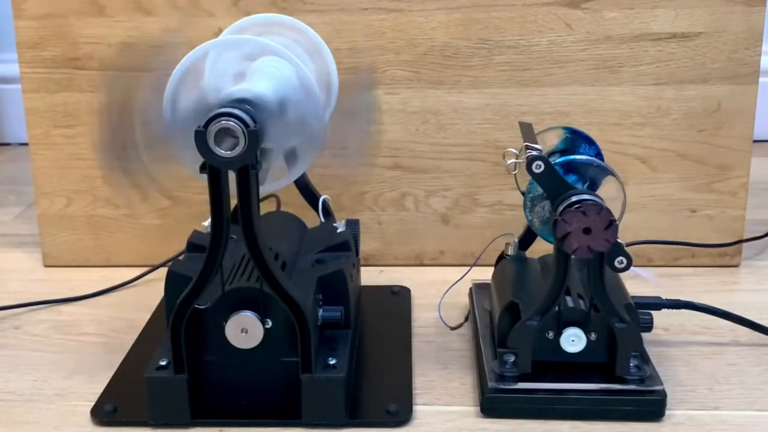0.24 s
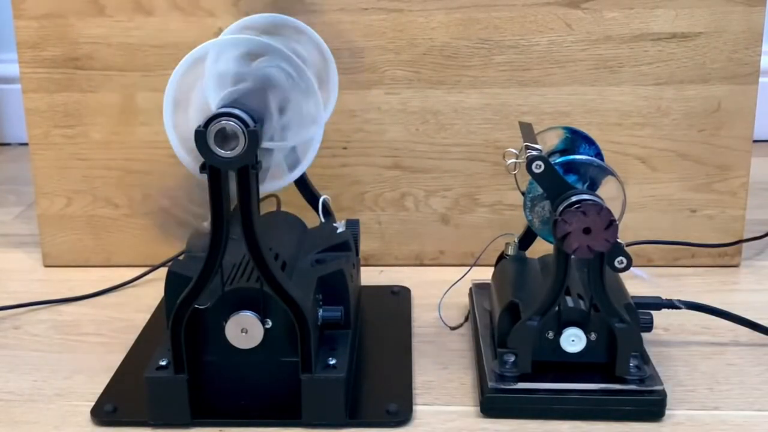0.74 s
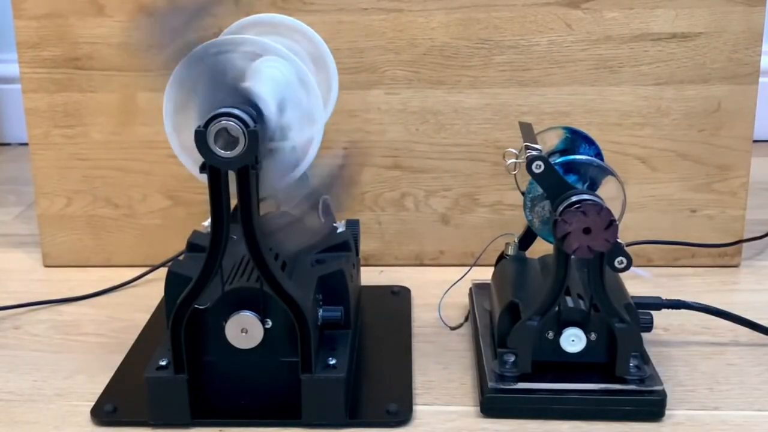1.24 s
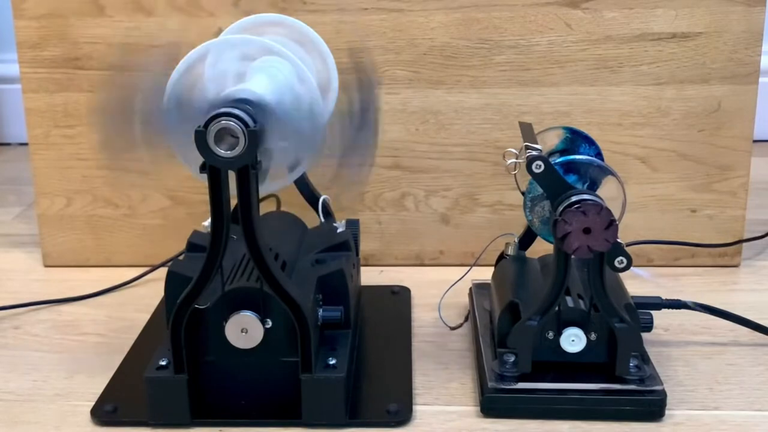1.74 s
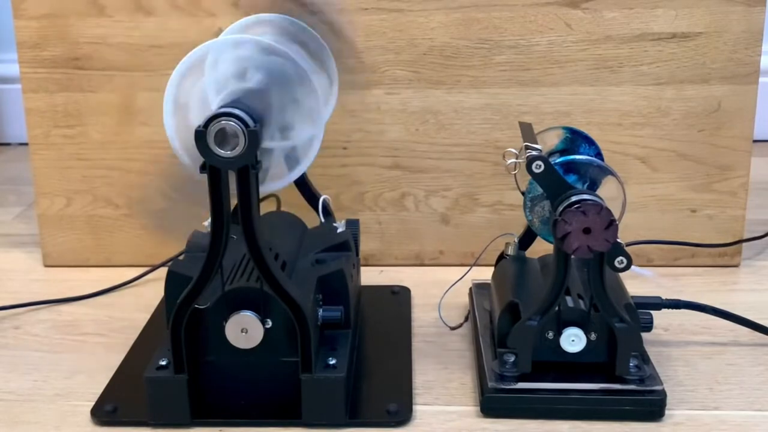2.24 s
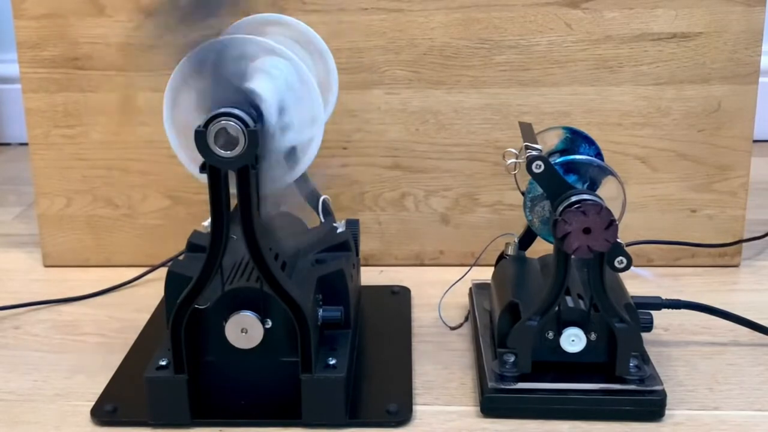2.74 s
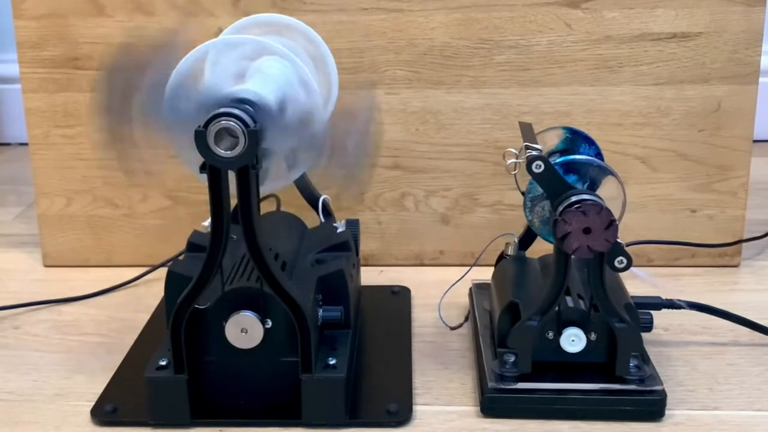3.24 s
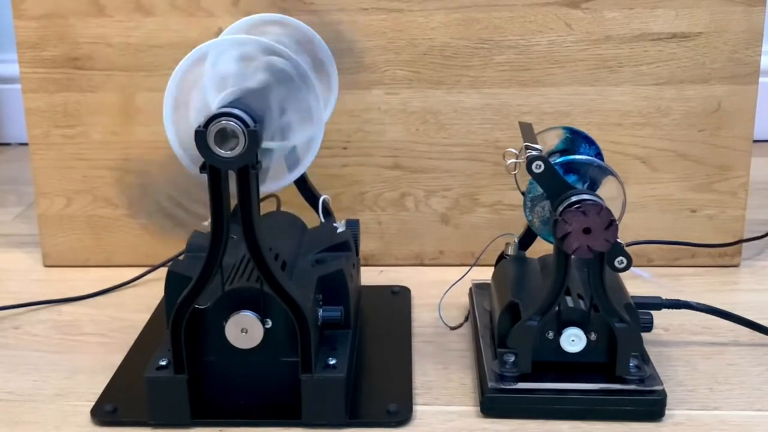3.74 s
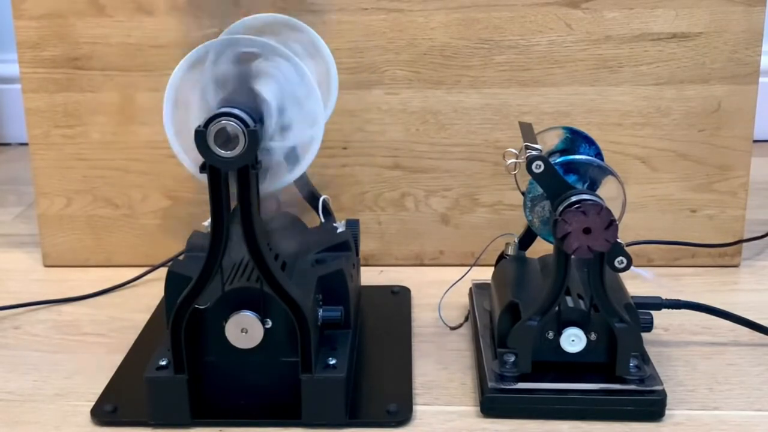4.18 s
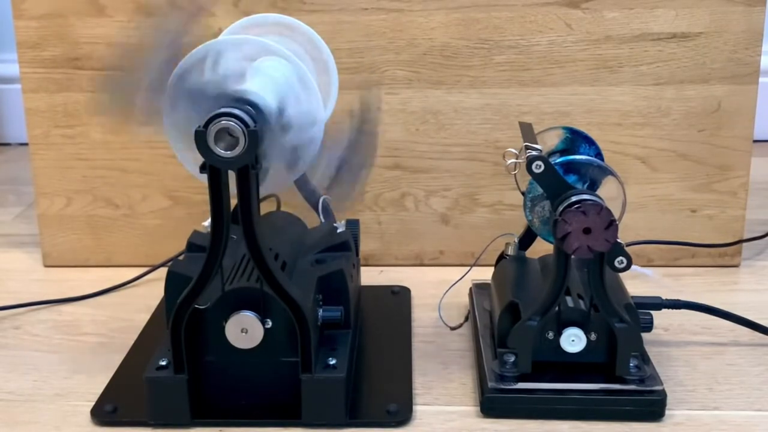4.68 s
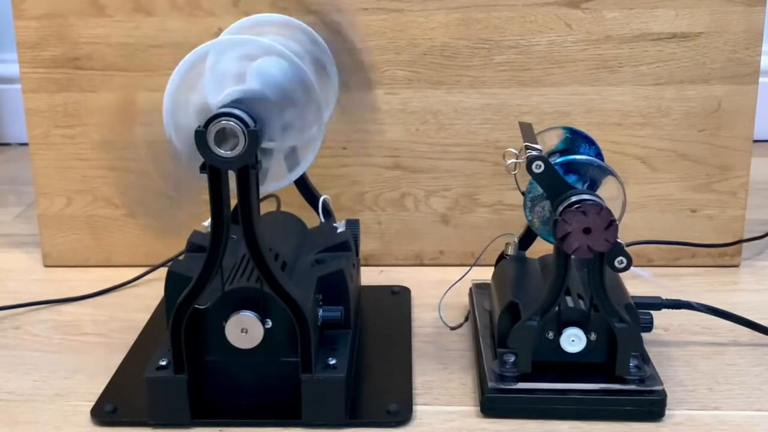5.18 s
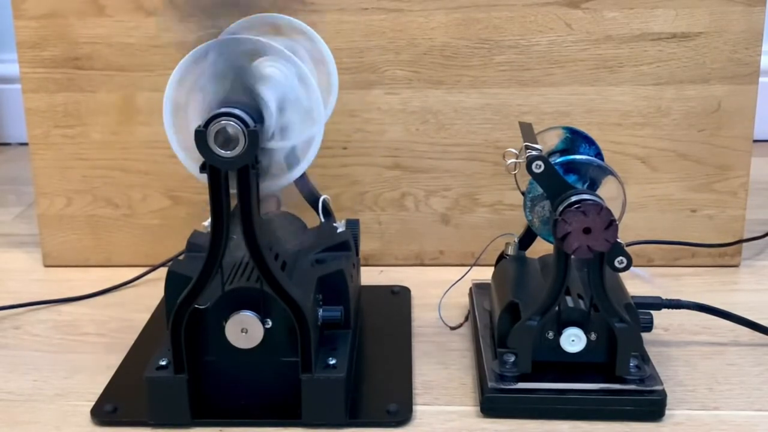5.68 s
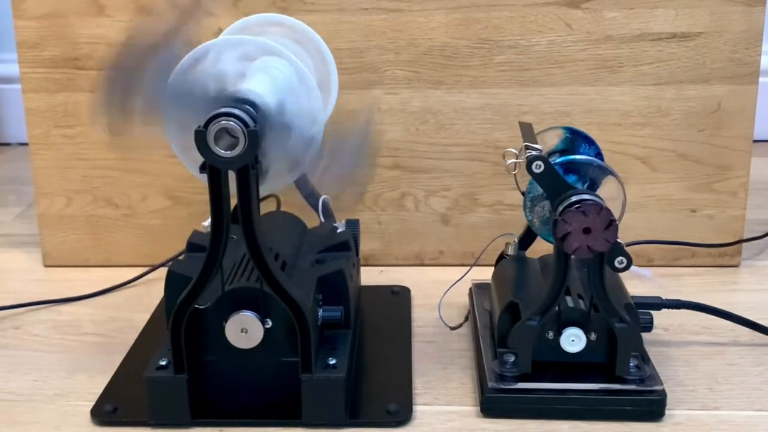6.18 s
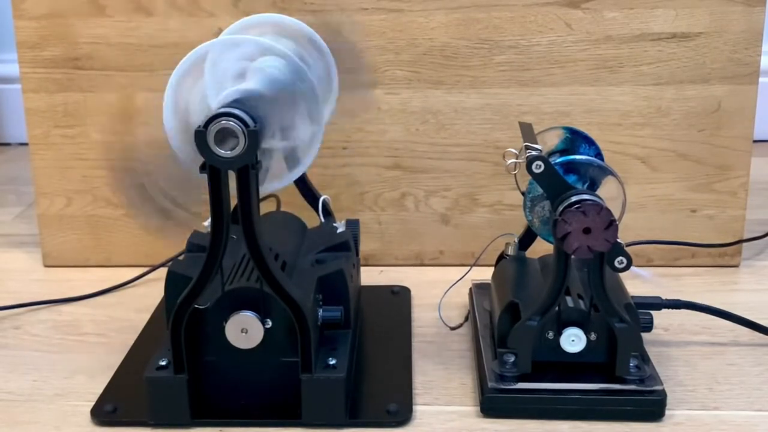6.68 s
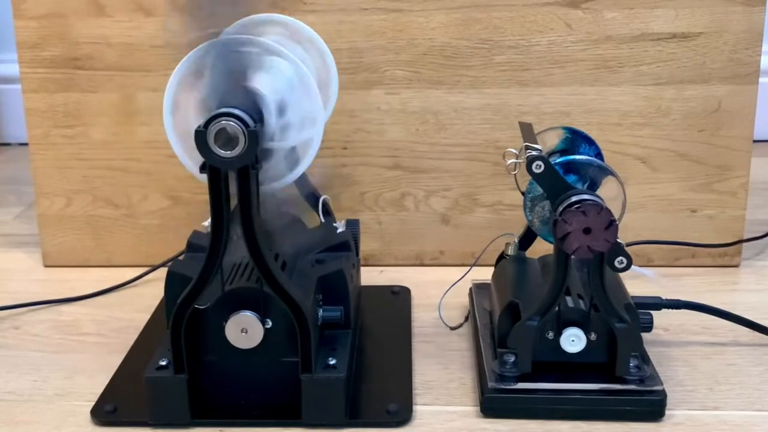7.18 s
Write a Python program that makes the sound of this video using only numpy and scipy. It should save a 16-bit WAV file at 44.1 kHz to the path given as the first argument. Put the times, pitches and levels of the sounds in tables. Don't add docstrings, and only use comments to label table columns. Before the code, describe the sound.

Two small electric spinning wheels run continuously on a wooden floor in a room, heard close in stereo. A rapid, low knocking hum swells and eases as its paired beats shift. Over it sit a thin wavering motor whine, rattly plastic housing chatter and soft churning air. A faint high band hiss pulses about four times a second, with scattered ticks and loose bobbin knocks. The machines neither start nor stop.

```python
import sys
import numpy as np
from scipy import signal
from scipy.fft import rfft, irfft, next_fast_len
from scipy.io import wavfile

SR = 44100
rng = np.random.default_rng(int(sys.argv[2]) if len(sys.argv) > 2 else 0)


def boost(x):
    u = np.asarray(x, float) / 20
    return 10 ** u


def transcribe(signal):
    frames = np.atleast_2d(signal).T
    limited = np.clip(frames, -1, 1)
    pcm = np.round(limited * 32767).astype(np.int16)
    wavfile.write(sys.argv[1], SR, pcm)


N = 327222
TIME = np.arange(N) / SR
SIZE = next_fast_len(N + 8192)
BINS_HZ = np.maximum(np.arange(SIZE // 2 + 1) * SR / SIZE, 1)
TURN_S = 1 / 16.362
PULLEY_HZ, SHAFT_HZ = 4.212, 19.922


def rms_one(x):
    return x / np.sqrt(np.mean(x ** 2) + 1e-20)


def at_hz(points):
    hz, value = np.transpose(points)
    return np.interp(np.log(BINS_HZ), np.log(hz), value)


def shaped(x, response):
    return irfft(rfft(x, SIZE) * response, SIZE)[..., :N]


def drift(rate_hz):
    pole = np.exp(-80 * np.pi * rate_hz / SR)
    noise = rng.standard_normal(N // 40 + 2002)
    slow = signal.lfilter([1], [1, -2 * pole, pole * pole], noise)[2000:]
    return np.interp(np.arange(N) / 40, np.arange(len(slow)), rms_one(slow))


def ring(clicks, hz, t60_s):
    pole, w = boost(-60 / (t60_s * SR)), 2 * np.pi * hz / SR
    return signal.lfilter([0, np.sin(w)], [1, -2 * pole * np.cos(w), pole * pole], clicks + 1e-18)


def clicks_at(seconds, sizes, length):
    out = np.zeros(length)
    index = np.clip(np.round(seconds * SR).astype(int), 0, length - 1)
    np.add.at(out, index, sizes)
    return out


# t/s, first knock/ms into turn, lead of second knock/ms
FLYER_CREEP = [(0, 49.2, 34.2), (.6, 49.0, 33.3), (1.0, 49.0, 32.6), (1.6, 49.0, 32.1), (2.15, 49.3, 32.5),
               (2.7, 48.6, 31.6), (4.2, 46.8, 29.6), (5.3, 45.6, 28.1), (6.0, 45.6, 28.3),
               (7.42, 44.9, 27.6)]


def creep(seconds):
    even_lead_ms, even_width_ms = 30.53, 1.26
    s, first_ms, lead_ms = np.transpose(FLYER_CREEP)
    lead = np.interp(seconds, s, lead_ms)
    off = lead - even_lead_ms
    even = np.exp(-(off / even_width_ms) ** 2)
    return np.interp(seconds, s, first_ms), lead, off, even


# f/Hz, level/dB, t60/s, polarity
BASE_MODES = [(129.3, -54.9, .37, -1), (146.4, -48.4, .32, -1), (187, -46.6, .057, 1), (220.5, -63, .23, 1)]
# f/Hz, level/dB, t60/s, polarity
FRAME_MODES = [(239, -68, .1, -1), (294, -55.5, .036, -1), (384, -52.5, .073, 1), (500, -62, .04, 1),
               (546.5, -63, .1, -1), (589, -55, .025, -1), (646, -70, .07, -1), (703, -64, .043, -1),
               (720, -67, .15, -1), (760, -65, .12, 1)]
# t/s, level/dB on frame knocks
JOINT_PLAY = [(0, -1), (.3, -1.5), (.7, -4), (1.3, -0.9), (1.9, -2), (2.8, -4.3), (3.7, 1.5), (4.9, -2.5),
              (5.4, 1.5), (5.7, 4), (6.1, 1), (6.45, 1), (6.8, -4.5), (7.42, 1.5)]


def flyer(jitter_ms, base_spread_db, frame_spread_db):
    starts = np.arange(-10, 121) * TURN_S
    run_in = round(10 * TURN_S * SR)
    first_ms, lead_ms, off, even = creep(starts)
    long_lead_ms, short_lead_ms = np.clip(off - 1, 0, 3), np.clip(-off, 0, 3)
    times = np.r_[starts + first_ms / 1000, starts + (first_ms - lead_ms) / 1000]
    times = times + jitter_ms * rng.standard_normal(len(times)) / 1000

    base_db = 2.5 - 3.5 * even - 0.2 * off
    frame_db = 1.55 - 0.6 * even + 1.28 * off + np.interp(starts, *np.transpose(JOINT_PLAY))
    frame_db = frame_db - 1.8 * drift(5.7)[np.clip(np.round(starts * SR).astype(int), 0, N - 1)]
    bright_lead_ms, bright_width_ms, bright_db_per_octave = 31.44, 0.72, 14
    bright = np.exp(-((lead_ms - bright_lead_ms) / bright_width_ms) ** 2)

    bodies = ((BASE_MODES, base_db, base_spread_db, -.3, -3),
              (FRAME_MODES, frame_db, frame_spread_db, .85, -5.5))
    out = 0
    for modes, blows_db, spread_db, early_ms, second_db in bodies:
        for hz, level_db, t60_s, polarity in modes:
            lift_db = bright_db_per_octave * max(np.log2(hz / 350), 0) * bright
            lift_db = lift_db - 1.5 * (hz > 600) * long_lead_ms
            first_db = blows_db + .3 * lift_db + 0.67 * (hz < 450) * short_lead_ms
            later_db = blows_db + second_db + lift_db + 1.3 * long_lead_ms
            chance_db = spread_db * rng.standard_normal(len(times))
            sizes = polarity * boost(np.r_[first_db, later_db] + level_db + chance_db)
            blows = clicks_at(times + run_in / SR - early_ms / 1000, sizes, N + run_in)
            out = out + ring(blows, hz, t60_s)[run_in:]
    return out


def shake(uneven_db):
    third_db, fourth_db, fifth_db, sixth_db = -64.5, -61, -70, -65
    off, turn = creep(TIME)[2], 2 * np.pi * TIME / TURN_S
    lopsided = np.clip((off - 1.2) / .8, 0, 1)
    third = boost(third_db + uneven_db * drift(2.6)) * np.where(off > 0, off / 3, off / 4)
    third = third * np.cos(3 * turn)
    fourth = boost(fourth_db + uneven_db * drift(1.4)) * (1 - lopsided) * np.sin(4 * turn)
    upper = lopsided * (boost(sixth_db) * np.sin(6 * turn) - boost(fifth_db) * np.cos(5 * turn))
    return np.sqrt(2) * (third + fourth + upper)


# f/Hz, share of speed, phase of fastest moment/turns
SPEED_SWING = [
    (PULLEY_HZ, .0048, .80),
    (SHAFT_HZ, .0065, .68),
    (PULLEY_HZ + SHAFT_HZ, .0030, .3),
]


def running_time():
    clock = TIME.copy()
    for hz, share, turns in SPEED_SWING:
        clock += share / (2 * np.pi * hz) * np.sin(2 * np.pi * (hz * TIME - turns))
    return clock


# f/Hz, level/dB rms, share of speed swing, wander/rad
MOTOR_LINES = [(478.4, -69.0, 1, .4), (797.4, -80.0, 1, .6), (881, -77.0, 1, .6), (969.3, -69.0, .7, .6),
               (1057.2, -70.5, 1, .5), (1146, -80.0, 1, .9), (1271, -80.0, .6, .6), (1433, -72.0, .65, .8),
               (1747, -74.0, .8, .9), (2053, -81.0, 1.15, .7), (2231.3, -70, 1.3, .5), (2381, -80, 1.5, .7),
               (2864, -77, .35, 1.4), (3055, -79.5, .6, 1.5), (3163, -78.5, .55, 2.0),
               (4105, -86.0, .25, 1.8), (4363, -85.0, .25, 1.8)]


def motors(flicker_db):
    out, ahead_s = np.zeros(N), running_time() - TIME
    for hz, level_db, share, wander_rad in MOTOR_LINES:
        phase = 2 * np.pi * hz * (TIME + share * ahead_s) + wander_rad * drift(3.54)
        out += np.sqrt(2) * boost(level_db + flicker_db * drift(12.3)) * np.sin(phase)
    return out


# f/Hz, width/Hz, level/dB at the top
HOUSING_MODES = [(770, 150, -10.5), (905, 170, -22), (956.6, 43, -1), (1025, 56, -8.5), (1188, 21, -18.5),
                 (1140, 28, -6.5), (1309.5, 51, -8), (1460, 26, -11.5), (1616, 50, -5.5), (1699, 90, -8),
                 (2233, 120, -18), (2625, 40, -22), (2720, 97, -17), (3334, 37, -18.5), (3430, 24, -19.5),
                 (4274, 34, -21), (5830, 690, -23.5)]
# f/Hz, depth/dB, first peak/turns
CHATTER_THROB = [(12.66, 2.2, .05), (19.922, 1.3, .28), (68.2, 2, .3), (88.1, 2.5, .3)]


def housings(own_db):
    clicks_per_s, level_total_db = 1200, -61.5
    throb_db = sum(depth_db * np.cos(2 * np.pi * (hz * TIME - turns))
                   for hz, depth_db, turns in CHATTER_THROB)
    out, count = 0, round(clicks_per_s * N / SR)
    for hz, width_hz, level_db in HOUSING_MODES:
        sizes = boost(2.0 * np.minimum(rng.exponential(1, (3, count)), 5))
        sizes = sizes * rng.choice([-1, 1], (3, count))
        shared, left, right = [clicks_at(rng.random(count) * N / SR, size, N) for size in sizes]
        chatter = boost(throb_db) * (shared + boost(own_db) * np.array([left, right]))
        t60_s = 1.95 / width_hz
        rung = ring(ring(chatter, hz, t60_s), hz, t60_s)
        out = out + boost(level_db) * np.sqrt(width_hz) * rms_one(rung)
    return boost(level_total_db + 1.7 * drift(2.2)) * rms_one(out)


# f/Hz, level/dB per Hz
AIR_COLOUR = [(24, -55), (45, -8), (70, -9), (120, -9.5), (190, -13), (270, -11), (430, -11.5), (470, -16),
              (650, -21), (850, -21.5), (1250, -25), (2000, -30), (3000, -38.5), (5000, -37.5),
              (7000, -40.5), (9000, -93)]
# f/Hz, level/dB re shared part
AIR_DIFFUSE = [(40, -3), (150, -5.5), (300, -6), (600, -10), (1200, -2), (3000, 5), (8000, -2.5)]


def air(patchy_db):
    puff_db = 0.4 * np.cos(4 * np.pi * (TIME - .019) / TURN_S)
    shared, *own = rng.standard_normal((3, N))
    mixed = shared + shaped(np.array(own), boost(at_hz(AIR_DIFFUSE)))
    noise = rms_one(shaped(mixed, boost(at_hz(AIR_COLOUR))))
    return boost(-56.3 + puff_db + patchy_db * drift(21.6)) * noise


def ticks(rows, t60_s):
    rebound_s, rebound_db = .0026, -3
    times, peak_db = np.transpose(rows)
    pair = clicks_at(np.r_[times, times + rebound_s], boost(np.r_[peak_db, peak_db + rebound_db]), N)
    fade = boost(-120 / (t60_s * SR))
    return signal.lfilter([np.e * (1 - fade)], [1, -2 * fade, fade ** 2], pair)


# f/Hz, level/dB per Hz
BAND_COLOUR = [(3500, -24), (5500, -16), (6500, 5), (7200, 7), (7900, -0.5), (8600, 6.5), (9300, -2),
               (10100, 6.5), (11500, -4.5), (12400, 1), (13400, -7), (14300, -3), (14800, -10),
               (15300, -26)]
# f/Hz, depth/dB, first peak/s
BAND_THROB = [(49.8, 1.5, 0.005)]
# t/s into circuit, level/dB peak
BAND_FLAWS = [(0.153, -57), (0.312, -65), (0.395, -56), (0.556, -51.5), (.802, -51), (1.032, -56),
              (1.169, -62), (1.270, -68), (1.414, -67), (1.478, -64), (1.750, -54.5), (1.804, -63),
              (2.046, -62)]
# t/s, level/dB peak
BAND_SNAGS = [(.066, -56), (.312, -47), (0.898, -53), (1.984, -40), (2.0, -47), (4.126, -43), (3.412, -46),
              (4.4353, -55), (4.4742, -47), (4.9616, -61), (5.0235, -60), (1.497, -53), (2.474, -57),
              (3.556, -59), (3.702, -60), (3.9465, -65), (5.696, -54), (5.088, -59), (5.3302, -45),
              (6.033, -58), (6.378, -45), (6.507, -45)]


def drive_band(flaw_spread_db):
    loop_s, left_lag_s = 2.1417, 1 / 4620
    pulley = (TIME - 0.12) * PULLEY_HZ % 1
    build = np.interp(pulley, [0, 0.04, 1], [.5, -.5, .5])
    rub_db = -70 + np.cos(2 * np.pi * (TIME - 0.48) / loop_s) + 4 * build
    throb_db = sum(depth_db * np.cos(2 * np.pi * hz * (TIME - first_s))
                   for hz, depth_db, first_s in BAND_THROB)
    grain_db = 0.54 * drift(6.7) + 1.73 * drift(120.0)

    passes = [(s + lap * loop_s, db + flaw_spread_db * rng.standard_normal())
              for s, db in BAND_FLAWS for lap in range(4)]
    passes = [row for row in passes if row[0] < N / SR - .01]
    bursts = boost(-9.0) * (ticks(passes, t60_s=.014) + ticks(BAND_SNAGS, t60_s=.004))
    contact = (boost(rub_db + throb_db + grain_db) + bursts) * rng.standard_normal((3, N))
    heard = contact[0] + boost(-13.0) * contact[1:]

    lag = np.exp(-1j * np.pi * BINS_HZ * left_lag_s)
    sides = np.array([lag, 1 / lag])
    colour = boost(at_hz(BAND_COLOUR))
    response = sides * colour / np.sqrt(np.mean(colour ** 2))
    lows = 1 / (1 + (BINS_HZ / 8000) ** 8)
    mids = 1 / (1 + (BINS_HZ / 11600) ** 12)
    highs = 1 / (1 + (BINS_HZ / 13400) ** 24)
    parts = (lows, mids - lows, highs - mids, 1 - highs)
    rub = sum(rfft(heard * boost(3.1 * drift(20.0)), SIZE) * response * part for part in parts)

    times, peak_db = np.transpose([row for row in BAND_SNAGS if row[1] > -52.5])
    edge = sides / (1 + (4500 / BINS_HZ) ** 4)
    cracks = rfft(clicks_at(times, boost(peak_db - 6), N), SIZE) * edge
    return irfft(cracks + rub, SIZE)[:, :N]


# phase/turns, f/Hz, level/dB peak, t60/s
SHAFT_TICKS = [(.31, 1680, -57.5, .010), (.48, 1660, -60, .010), (.66, 1680, -60, .010),
               (.30, 1010, -62, .04), (.73, 2900, -68, .008)]


def shaft(spread_db):
    out, clock, laps = 0, running_time(), np.arange(int(N / SR * SHAFT_HZ))
    for turns, hz, peak_db, t60_s in SHAFT_TICKS:
        times = np.interp((laps + turns) / SHAFT_HZ, clock, TIME)
        times = times + 2e-4 * rng.standard_normal(len(laps))
        sizes = boost(peak_db + spread_db * rng.standard_normal(len(laps)))
        rung = ring(ring(clicks_at(times, sizes, N), hz, t60_s), hz, t60_s)
        out = out + rung * 2 * np.e * np.log(1000) / (t60_s * SR)
    return out


# t/s, level/dB peak,
# f/Hz, crack level/dB
BOBBIN_KNOCKS = [(.066, -48, 1720, -58), (0.196, -42.5, 1070, -66), (.315, -51, 1700, -75),
                 (.567, -51, 1670, -75), (0.62, -47, 1050, -54.5), (0.755, -51, 950, -56.5),
                 (0.816, -55, 1740, -75), (0.868, -50, 960, -70), (.899, -58, 960, -60),
                 (1.219, -54, 1720, -75), (1.269, -54, 970, -71), (1.422, -47, 1040, -73),
                 (1.821, -55, 980, -75), (1.974, -44, 1140, -77), (2.92, -50, 970, -75),
                 (2.982, -59, 1100, -72), (2.994, -46.5, 1160, -59), (3.774, -58, 970, -74),
                 (3.933, -49, 970, -79), (4.255, -43, 960, -75), (4.683, -46.5, 1640, -73),
                 (4.915, -48, 1110, -69), (5.232, -43.5, 970, -72), (5.69, -56, 950, -74),
                 (5.796, -45, 1050, -75), (6.221, -47, 970, -75), (6.395, -47, 980, -78),
                 (6.493, -46, 1740, -66), (6.502, -43.5, 1130, -59)]


def bobbin():
    out = np.zeros(N)
    tap = clicks_at(np.array([0, .007, .017, .028]), boost(np.array([3.0, 0.0, -16.0, -8.0])), 3000)
    body = ring(tap, 1690, .015)
    crack = .7 * ring(tap, 3200, .007) - ring(tap, 4250, 0.009) + ring(tap, 5700, .003)
    for s, peak_db, hz, crack_db in BOBBIN_KNOCKS:
        knock = boost(peak_db - 3.0) * (ring(tap, hz, 0.022) + boost(-9.0) * body)
        start = round(s * SR)
        out[start:start + len(tap)] += knock + boost(crack_db + 6.0) * crack
    return out


# f/Hz, lead/rad
LEFT_LEAD = [(0, 0), (150, -.08), (320, .1), (1400, .45), (2240, 1.2), (2700, 2.0), (2900, 2.5),
             (3300, 2.1), (3700, 2.7), (4500, 2.4), (6000, 3.8), (7000, 3.1)]
# f/Hz, level/dB
LEFT_EXCESS = [(60, -0.5), (110, -1.0), (200, -1.0), (380, 0.0), (700, 0.5), (1290, 2.0), (2380, -1.5),
               (4400, -2.0), (8120, 0.0), (15000, 0.0)]


def ports(x):
    hz, lead_rad = np.transpose(LEFT_LEAD)
    half = boost(at_hz(LEFT_EXCESS) / 2) * np.exp(.5j * np.interp(BINS_HZ, hz, lead_rad))
    return shaped(x, np.array([half, 1 / half]))


def scene():
    knocks = flyer(jitter_ms=.06, base_spread_db=1.0, frame_spread_db=2.0) + shake(uneven_db=2.0)
    steady = motors(flicker_db=2.0) + housings(own_db=-0.5) + air(patchy_db=1.93)
    band = drive_band(flaw_spread_db=2.8)
    taps = shaft(spread_db=2.5) + bobbin()
    return ports(knocks + steady + taps) + band


def low_pass(x):
    return signal.sosfilt(signal.butter(12, 15640, fs=SR, output="sos"), x)


def record(dry):
    thin = signal.sosfilt(signal.butter(2, 43, "high", fs=SR, output="sos"), dry)
    return low_pass(thin)


dry = scene()
out = record(dry)
transcribe(out)
```